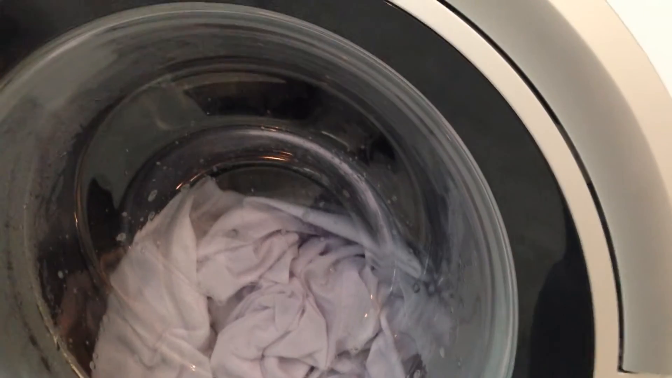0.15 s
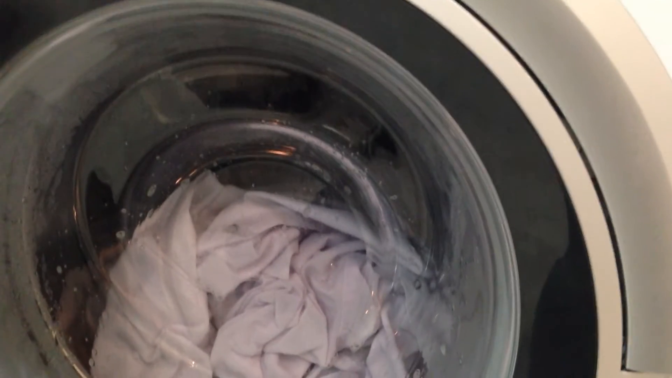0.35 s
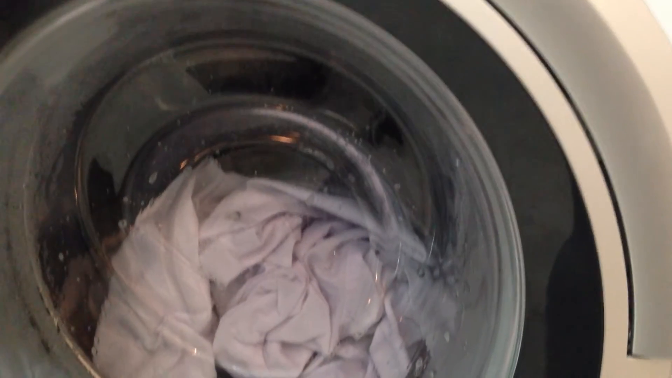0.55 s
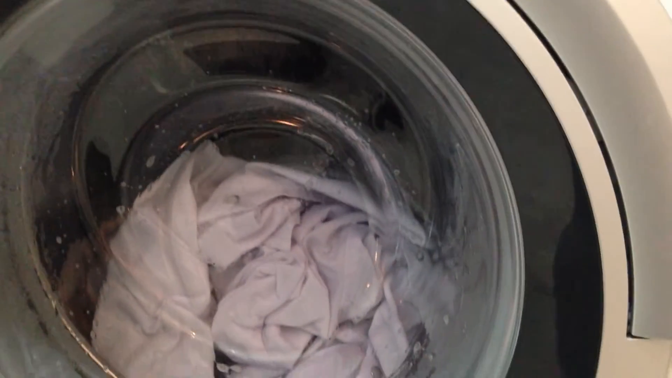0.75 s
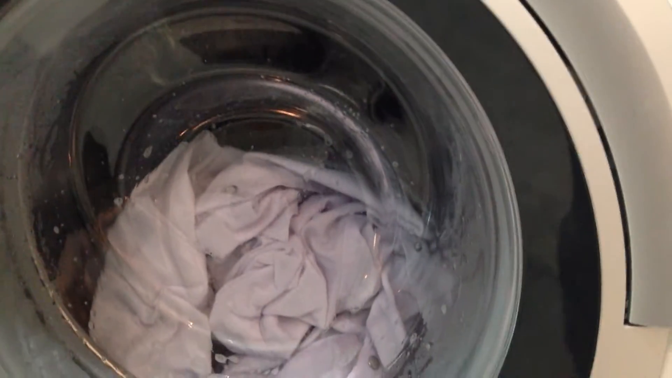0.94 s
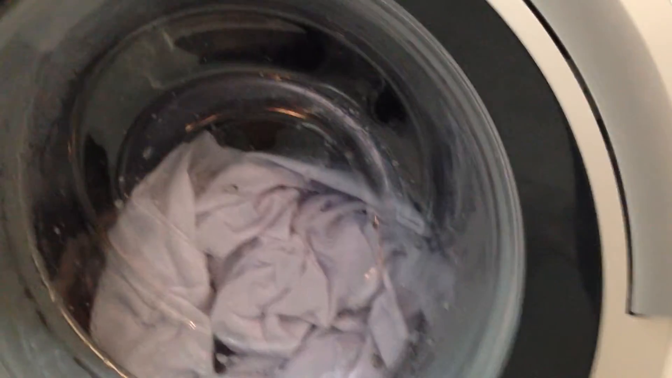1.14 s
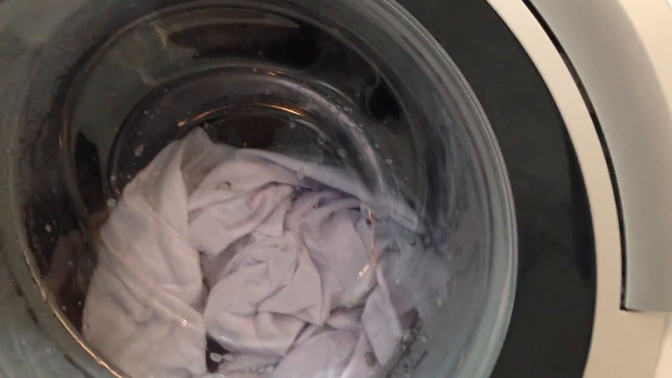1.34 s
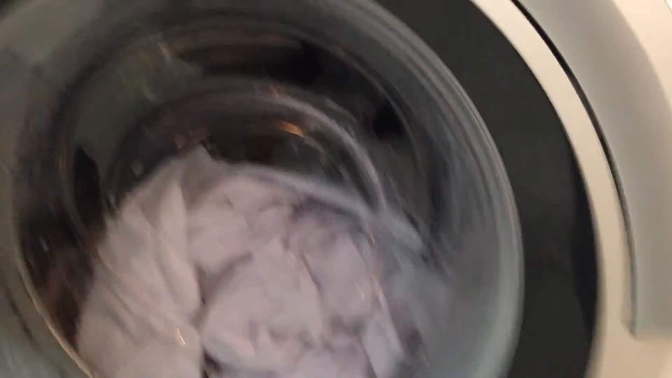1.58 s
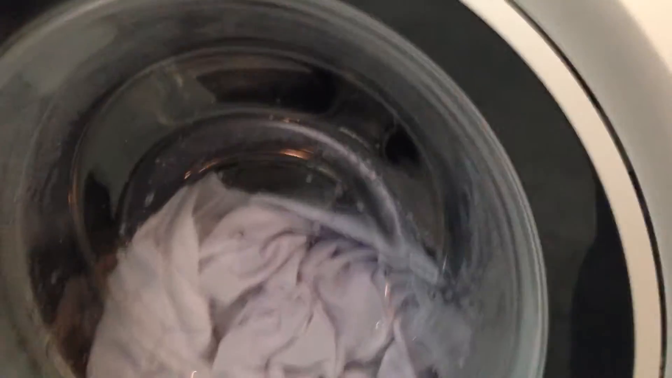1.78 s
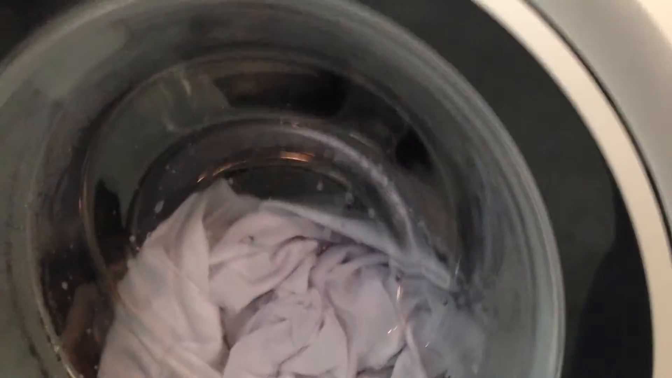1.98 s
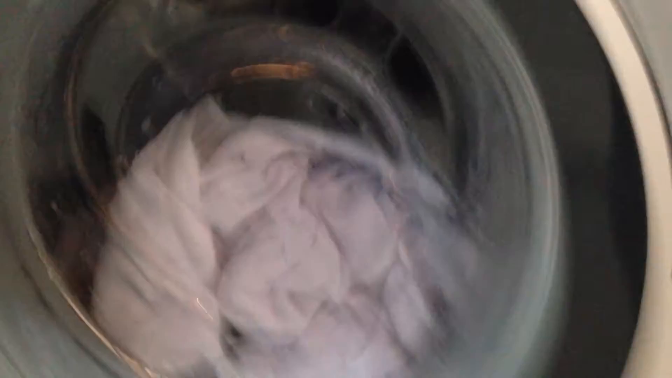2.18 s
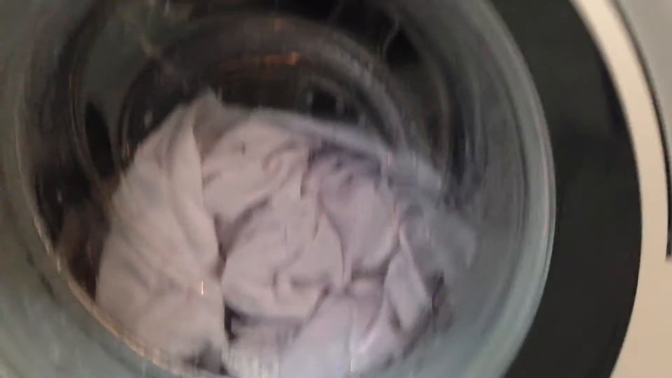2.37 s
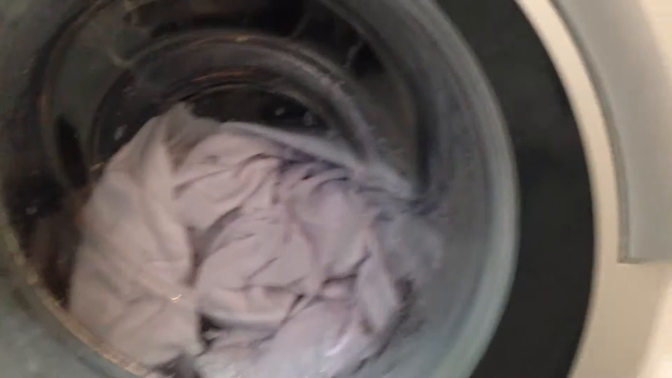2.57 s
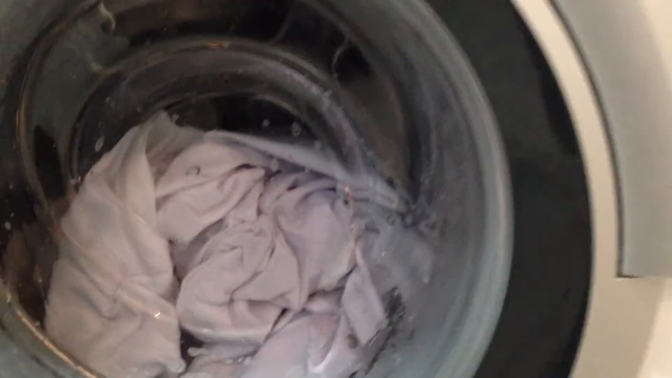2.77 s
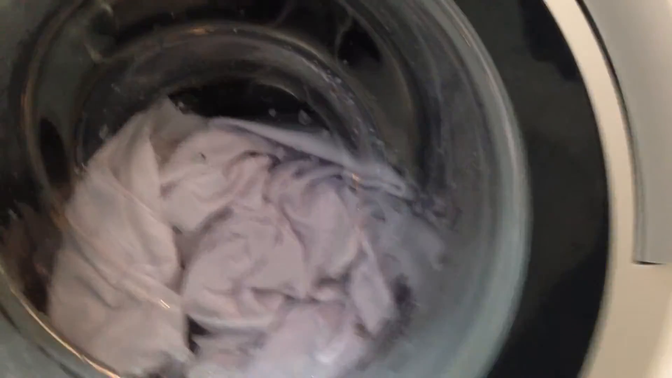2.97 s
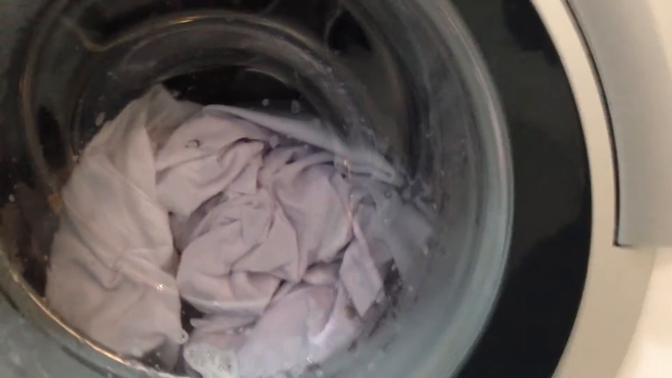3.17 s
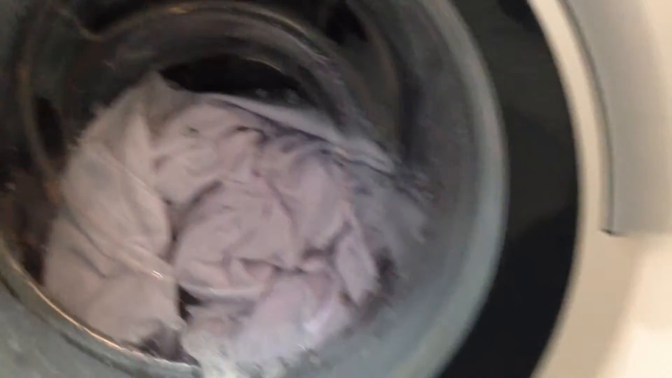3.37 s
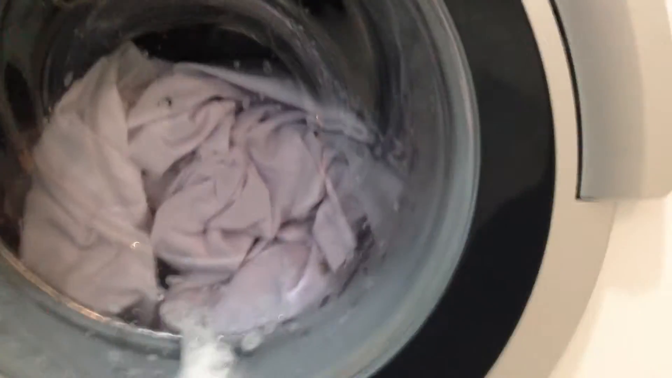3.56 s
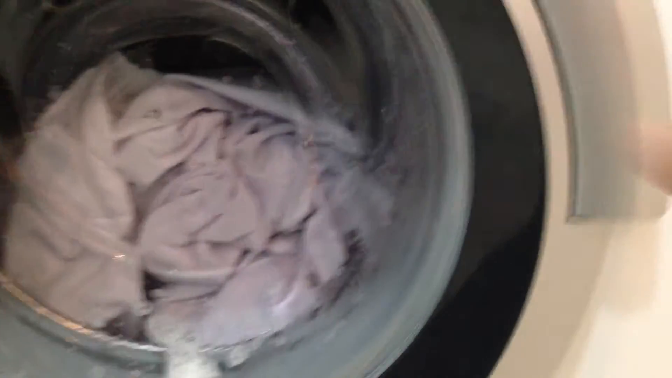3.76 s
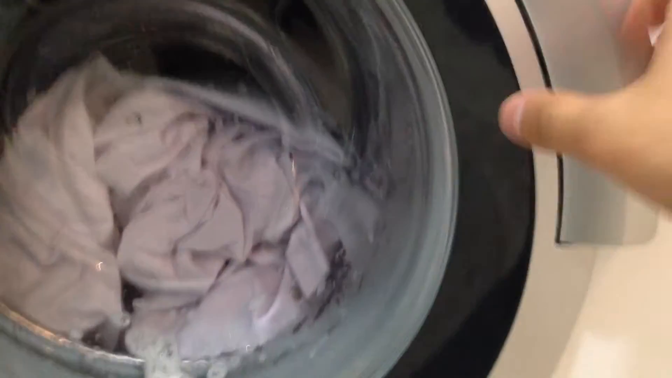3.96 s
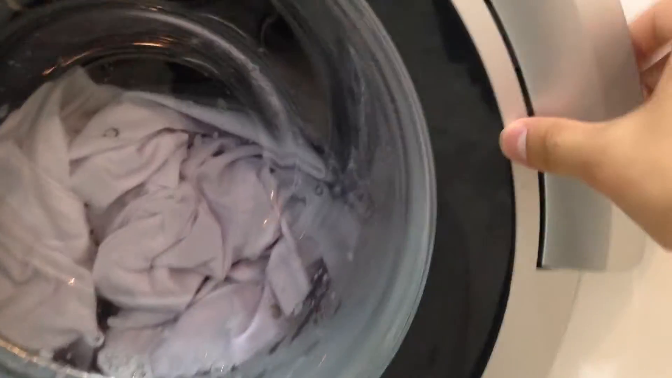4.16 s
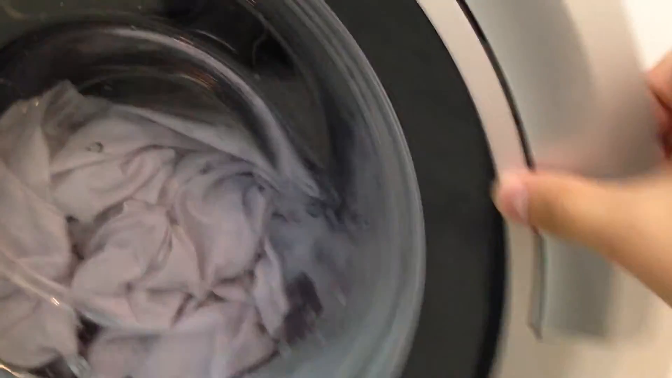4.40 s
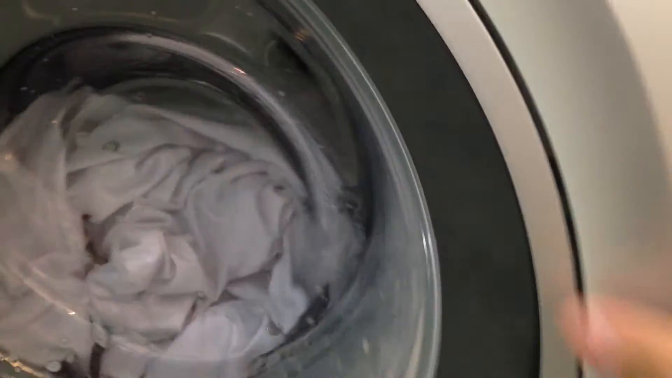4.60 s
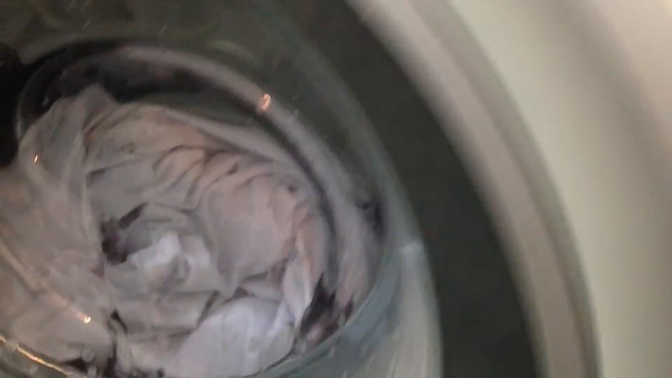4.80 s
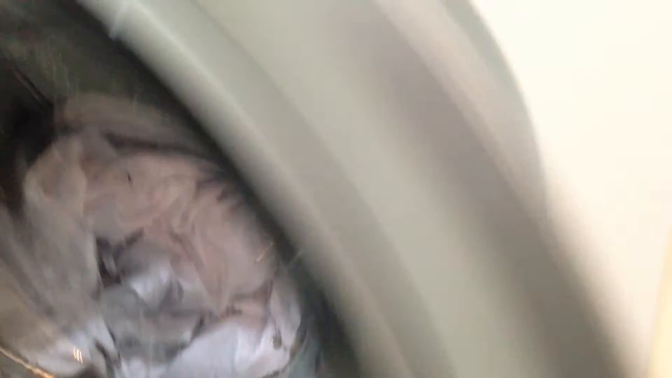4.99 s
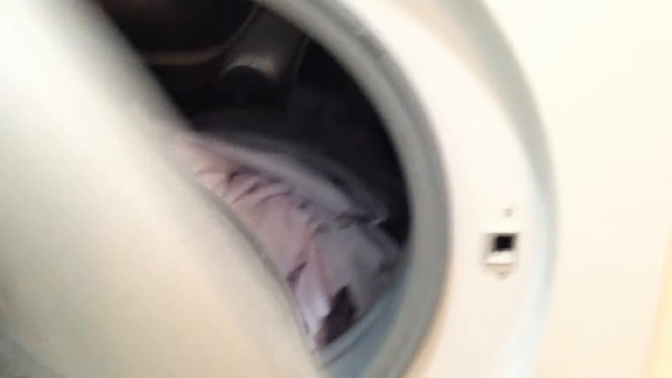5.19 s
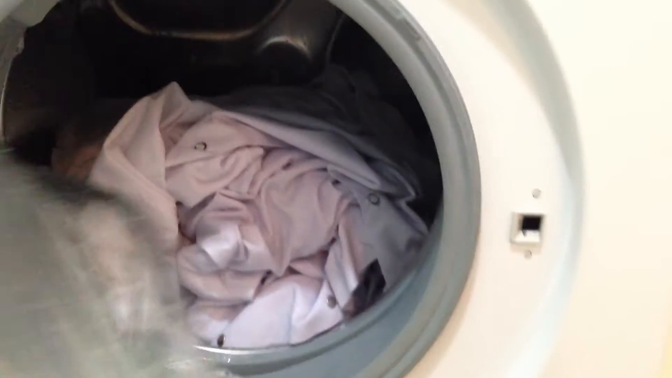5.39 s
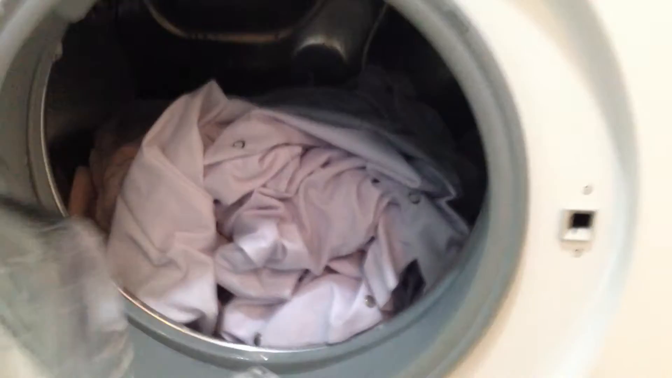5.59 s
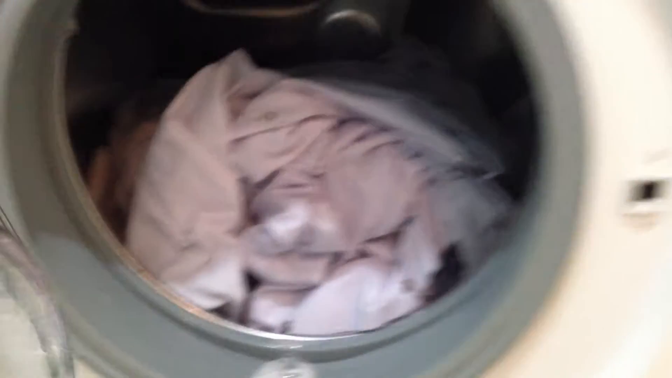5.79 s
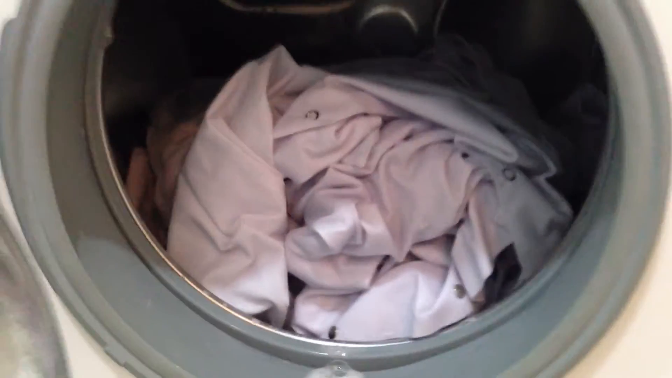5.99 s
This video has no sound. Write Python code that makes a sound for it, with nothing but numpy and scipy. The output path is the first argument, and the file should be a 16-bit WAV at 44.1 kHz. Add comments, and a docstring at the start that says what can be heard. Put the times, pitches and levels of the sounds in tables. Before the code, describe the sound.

Close, clean indoor pickup of a washing machine door. Low room tone holds a few tiny ticks, a faint metallic ring, cloth rustles and soft bumps. Then a very loud, bright lock snap with a quick rattle and metallic ring, small knocks, handle clicks, a brief stuttering rubber pull and a hard double latch clack. Afterward only faint sliding and scuffing remain.

```python
"""Washing machine door opening

A front-loading washing machine stands finished in a small hard-walled room. Its door lock snaps back
and rings the cabinet; the handle is taken, the rubber seal judders loose, the latch clacks, the door opens.
Blows are noise cracks filtered by the body, plus a room tail and ringing modes; seal slips are damped sines.
Someone shifts about quietly: ticks, bumps and a faint ring, and shaped noise for rustles, slides and room tone."""
import sys
import numpy as np
from scipy import signal
from scipy.fft import rfft, irfft
from scipy.io import wavfile

SR = 44100
rng = np.random.default_rng(int(sys.argv[2]) if len(sys.argv) > 2 else 0)


def bounce(signal):
    """Save signal as a 16-bit WAV file at the path given by the first command-line argument."""
    frames = np.transpose(np.atleast_2d(signal))
    limited = np.clip(frames, -1, 1)
    pcm = np.round(limited * 32767).astype(np.int16)
    wavfile.write(sys.argv[1], SR, pcm)


N = 266408
TIME = np.arange(N) / SR
AGE = TIME[:int(.8 * SR)]  # seconds since a blow
BAND_EDGES_HZ = np.geomspace(25, 16000, 29)
BAND_HZ = np.sqrt(BAND_EDGES_HZ[1:] * BAND_EDGES_HZ[:-1])
BANDS = [signal.butter(2, edges, "band", fs=SR, output="sos") for edges in zip(BAND_EDGES_HZ, BAND_EDGES_HZ[1:])]


def amp(db):
    """Decibels to gain."""
    return 10 ** (np.asarray(db) / 20)


def at_hz(points, hz):
    """Read a table on a log-frequency axis."""
    f, value = np.transpose(points)
    return np.interp(np.log(hz), np.log(f), value)


def high_pass(sound, order, cut_hz):
    """Butterworth low cut."""
    return signal.sosfilt(signal.butter(order, cut_hz, "high", fs=SR, output="sos"), sound)


def band_gains(spectrum):
    """Band gains that give white noise this colour at rms 1."""
    gain = amp(at_hz(spectrum, BAND_HZ))
    power = np.sum(gain ** 2 * np.diff(BAND_EDGES_HZ)) * 2 / SR
    return gain / np.sqrt(power)


def hiss(spectrum):
    """Steady coloured noise, rms 1; neighbouring bands use separate noises."""
    white = rng.standard_normal((2, N))
    out = np.zeros(N)
    for k, (sos, gain) in enumerate(zip(BANDS, band_gains(spectrum))):
        out += gain * signal.sosfilt(sos, white[k % 2])
    return out


def fade(t60_s):
    """An exponential decay from 1, down 60 dB at t60_s."""
    return np.exp(-np.log(1000) * AGE / t60_s)


def ring(modes):
    """Damped sines of a body struck once, in alternating sign."""
    return sum((-1) ** k * amp(db) * fade(t60_s) * np.sin(2 * np.pi * hz * AGE)
               for k, (hz, db, t60_s) in enumerate(modes))


def add(out, s, sound):
    """Mix a sound in at time s."""
    at = int(s * SR)
    out[at:at + len(sound)] += sound[:N - at]


def hardness(hz, bass_db, treble_db, bass_hz=350, treble_hz=3500):
    """Two shelves in dB: heavy contacts add bass, hard ones add treble."""
    return bass_db / (1 + (hz / bass_hz) ** 4) + treble_db / (1 + (treble_hz / hz) ** 4)


def resonances(hz, peaks):
    """Gain in dB of a set of bell-shaped resonances."""
    return sum(db / (1 + (2 * (hz - centre_hz) / width_hz) ** 2) for centre_hz, width_hz, db in peaks)


def filtered(sound, gain):
    """Causal (minimum-phase) filter with this gain on an even frequency grid: nothing sounds early."""
    cepstrum = irfft(np.log(gain))
    size = len(cepstrum)
    # folding the cepstrum forward gives minimum phase
    cepstrum[1:size // 2] *= 2
    cepstrum[size // 2 + 1:] = 0
    return irfft(rfft(sound, size) * np.exp(rfft(cepstrum)))[:len(sound)]


# Room decay. Each row: frequency in Hz, t60 in seconds.
ROOM_DECAY = [(60, 0.97), (200, .5), (600, 0.52), (1500, 0.43), (3000, 0.42), (5500, .36), (9000, 0.27),
              (15000, 0.32)]


def room_tail(build_s):
    """Diffuse echoes swell quickly, then die at a rate set by frequency."""
    white = rng.standard_normal((2, len(AGE)))
    dying = np.zeros(len(AGE))
    for k, t60_s in enumerate(at_hz(ROOM_DECAY, BAND_HZ)):
        dying += signal.sosfilt(BANDS[k], white[k % 2]) * fade(t60_s)
    return dying * (1 - np.exp(-AGE / build_s))


def blows(rows, colour, peaks, modes, contact_t60_s, room_db, snap_db, modes_db, build_s, thin_hz,
          tail_peak_share=0.18):
    """Each blow: a snap and short crack coloured by the body, the room's tail, and clear modes that ring on."""
    out, hz = np.zeros(N), np.linspace(1, SR / 2, 32769)
    peaks_db = resonances(hz, peaks)
    body = amp(at_hz(colour, hz) + peaks_db)
    body /= np.sqrt(np.mean(body ** 2))
    # the room gathers sound from every side of the body, so its tail is less peaky
    diffuse = body * amp((tail_peak_share - 1) * peaks_db)
    diffuse /= np.sqrt(np.mean(diffuse ** 2))
    for s, level_db, bass_db, treble_db in rows:
        crack = rng.standard_normal(len(AGE)) * fade(contact_t60_s)
        crack[0] += amp(snap_db)
        # the first crack is thin: its bass only builds up in the room
        crack = high_pass(crack, 2, thin_hz)
        contact = amp(hardness(hz, bass_db, treble_db))
        direct = filtered(crack, body * contact)
        tail = filtered(room_tail(build_s), diffuse * contact)
        struck_modes = [(f, db + hardness(f, bass_db, treble_db) + rng.normal(0, 1), t60_s)
                        for f, db, t60_s in modes]
        add(out, s, amp(level_db) * (direct + amp(room_db) * tail + amp(modes_db) * ring(struck_modes)))
    return out


def stroke(s, length_s, level_db, rise_share=.42):
    """Gain of one rubbing stroke: a rounded swell to its peak at s, then a slower fade."""
    phase = (TIME - s) / (length_s * np.where(TIME < s, rise_share, 1 - rise_share))
    return amp(level_db) * np.exp(1 - np.hypot(1, 2 * phase / np.sqrt(2)))


# Room noise spectrum. Each row: frequency in Hz, relative density in dB per Hz.
ROOM_COLOUR = [(15, -41), (25, -17), (55, -3.5), (183, -1), (221, -4), (267, -1.5), (349, -8.5), (445, -8),
               (684, -11.5), (895, -15), (1200, -16), (1410, -17), (3830, -13.5), (14300, -16.5),
               (15500, -18)]


def room_tone(level_db=-67.5):
    """Steady coloured noise of the quiet room."""
    return amp(level_db) * hiss(ROOM_COLOUR)


# Sharp ticks. Each row: start in seconds, relative level in dB, bass in dB, treble in dB.
TICK_HITS = [(.568, -44, 13.5, 1.5), (.697, -53, 10, -3.5), (1.835, -49.5, -2, -17), (2.022, -45, -17, -10),
             (2.046, -45.5, -7, -14), (2.056, -41, -16, -24), (4.020, -41.5, 10, -8.5)]
# Tick spectrum. Each row: frequency in Hz, relative density in dB per Hz.
TICK_SPECTRUM = [(50, -29), (110, -9.5), (300, -5.5), (550, -13), (850, -6), (1300, -7.5), (1900, -12.5),
                 (2800, -17.5), (4700, -2), (6500, -9), (9000, -6.5), (11000, -14), (13500, -9.5),
                 (15500, -36)]
# Tick resonances. Each row: centre in Hz, width in Hz, gain in dB.
TICK_RESONANCES = [(1830, 290, 8.1), (2046, 120, 7.1), (4580, 750, 4.5), (5060, 400, 6), (8800, 530, 8.3),
                   (13200, 760, 5)]
# Ring left by the ticks. Each row: frequency in Hz, relative level in dB, t60 in seconds.
TICK_RING = [(132, -29, 0.65), (281, -26, 0.53), (352, -23.5, 0.63), (1984, -22.5, 0.19), (4640, -50, 0.12)]


def ticks():
    """Sharp ticks of the lock and of fingers on the plastic: short cracks and faint modes."""
    return blows(TICK_HITS, TICK_SPECTRUM, TICK_RESONANCES, TICK_RING, contact_t60_s=0.037,
                 room_db=-13, snap_db=-9, modes_db=-2.5, build_s=0.01, thin_hz=247)


# Faint ring. Each row: frequency in Hz, relative level in dB, t60 in seconds.
TING_RING = [(342.5, 2, 0.11), (463, -20, 0.96), (1200, -11, 0.16), (1563, -4.5, 0.31), (1650, -5.5, 0.32),
             (1612, -7, 0.45), (1780, -9, 0.13), (1850, -13, .4), (2090, -7.5, 0.15)]


def ting(start_s=.692, level_db=-53.5, rise_s=0.0066, direct_db=-2, room_db=-4):
    """A faint metallic ring: damped sines that swell and fade, blurred by the room."""
    out, tail = np.zeros(N), room_tail(rise_s)
    direct = (1 - np.exp(-AGE / rise_s)) * ring(TING_RING)
    echoes = signal.fftconvolve(direct, tail / np.linalg.norm(tail))[:len(AGE)]
    add(out, start_s, amp(level_db) * (amp(direct_db) * direct + amp(room_db) * echoes))
    return out


# Sleeve and foot scuffs. Each row: peak in seconds, length in seconds, relative level in dB, centre in Hz.
RUSTLE_STROKES = [(1.828, 0.35, -69, 1930), (2.16, 0.13, -62, 1080), (2.274, 0.21, -63.5, 690),
                  (5.53, 0.56, -71, 2600), (5.774, 0.021, -62.5, 1400), (5.825, 0.034, -61.5, 930),
                  (5.883, 0.082, -61, 746), (5.98, 0.03, -62, 746)]


def rustle(width_octaves=1.0, grain_db=1.5, trim_db=-5.0):
    """Brushes and scuffs of sleeves and feet: grainy noise whose centre follows the strokes' power-weighted
    mean centre."""
    power = np.array([stroke(s, length_s, db) ** 2 for s, length_s, db, _ in RUSTLE_STROKES]) + 1e-18
    total_power = power.sum(axis=0)
    centre_hz = np.array(RUSTLE_STROKES)[:, -1] @ power / total_power
    grain = np.interp(TIME, np.linspace(0, TIME[-1], 900), rng.standard_normal(900))
    white, octave = rng.standard_normal((2, N)), np.log2(centre_hz)
    out = np.zeros(N)
    for k, (sos, hz) in enumerate(zip(BANDS, BAND_HZ)):
        out += signal.sosfilt(sos, white[k % 2]) / (1 + ((np.log2(hz) - octave) / width_octaves) ** 2)
    # bandwidth grows with the centre, so divide it out
    return out * np.sqrt(total_power * SR / centre_hz) * amp(trim_db + grain_db * grain)


# Soft low bumps. Each row: start in seconds, relative level in dB, bass in dB, treble in dB.
BUMP_HITS = [(2.19, -55.5, 1, -9), (2.332, -51.5, 8, -5), (2.351, -45, -7, -5), (2.388, -50, -7.5, -7),
             (3.517, -47.5, 5.5, -20), (3.542, -48, 9.5, -14), (4.012, -51.5, 12, -17),
             (4.303, -37, 4, -22)]
# Bump spectrum. Each row: frequency in Hz, relative density in dB per Hz.
BUMP_SPECTRUM = [(40, -25.5), (90, -19), (170, -1), (280, -18), (550, -19.5), (1000, -35.5), (2200, -28.5),
                 (6000, -35), (14000, -48.5)]
# Broad bump resonances. Each row: centre in Hz, width in Hz, gain in dB.
BUMP_RESONANCES = [(155, 50, 3), (500, 95, 4)]
# Bump ring. Each row: frequency in Hz, relative level in dB, t60 in seconds.
BUMP_RING = [(152, -12, 0.54), (198.2, -2.5, 0.34)]


def bumps():
    """Soft low bumps: bass-heavy cracks over two low modes."""
    return blows(BUMP_HITS, BUMP_SPECTRUM, BUMP_RESONANCES, BUMP_RING, contact_t60_s=0.06,
                 room_db=-7.5, snap_db=4.0, modes_db=-6, build_s=0.0092, thin_hz=60.1)


# Lock bolt ticks, slides, hits its stop (last). Each row: start in seconds, relative level in dB,
# bass in dB, treble in dB.
BOLT_HITS = [(3.0415, -52, -22, 2), (3.0603, -29.5, -13, -4.5), (3.0625, -26.5, -6, -2),
             (3.0652, -14, -0.5, 1.5)]
# Lock spectrum. Each row: frequency in Hz, relative density in dB per Hz.
LOCK_SPECTRUM = [(30, -29), (60, -14), (125, -6.5), (220, -3.5), (370, -4), (540, -6.5), (650, -15),
                 (790, -6), (1400, -9), (2400, -6.5), (3400, -11.5), (6000, -15.5), (9500, -19.5),
                 (15000, -22)]
# Panel resonances. Each row: centre in Hz, width in Hz, gain in dB.
LOCK_RESONANCES = [(730, 43, 1), (903, 52, 6.5), (1013, 80, 6), (1147, 100, 7), (1760, 40, 11.5),
                   (2090, 40, 3.5), (2300, 110, 7), (2970, 24, 0.5), (4310, 200, 7.5), (5900, 210, 5.5),
                   (7310, 100, 11.5), (10500, 60, 9)]
# Long cabinet ring. Each row: frequency in Hz, relative level in dB, t60 in seconds.
CABINET_RING = [(125, -19.5, 0.72), (137, -27.5, 0.36), (183.4, -22.5, 0.58), (301.5, -24, 0.86),
                (293, -23, .35), (375.4, -19, 0.39), (766, -16, 0.51), (1075, -23.5, .36),
                (1454, -27.5, 0.45), (1872, -24.5, .38), (2220, -27.5, .3), (2692, -21.5, 0.11),
                (2980, -27, 0.17), (4490, -32, 0.31), (5770, -24.5, 0.2)]


def lock(rebounds=3, gap_s=.0076, drop_db=10, loss_db=0.5, treble_db=-6.5):
    """The bolt travels, hits its stop and rebounds, weaker and duller; the cabinet rings."""
    stop_s, stop_db = BOLT_HITS[-1][:2]
    hits = list(BOLT_HITS)
    for k in range(rebounds):
        hits.append((stop_s + (k + 1) * gap_s, stop_db - drop_db - k * loss_db, 0, treble_db))
    return blows(hits, LOCK_SPECTRUM, LOCK_RESONANCES, CABINET_RING, contact_t60_s=0.046,
                 room_db=-10.5, snap_db=10.0, modes_db=-5.0, build_s=0.0049, thin_hz=400)


# Dull knocks: first the lock lets go with a knock inside, then the door knocks in its frame. Each row: start in
# seconds, relative level in dB, bass in dB, treble in dB.
KNOCK_HITS = [(3.515, -38, -11, -15), (4.308, -38.5, -1.5, 6), (4.3525, -41.5, 1, -6),
              (4.3955, -34.5, 3.5, -2), (4.411, -35, 4, -1.5)]
# Knock spectrum. Each row: frequency in Hz, relative density in dB per Hz.
FRAME_SPECTRUM = [(40, -12), (130, 4), (330, 3.5), (480, -3.5), (620, -5.5), (840, 2.5), (1000, -3),
                  (1180, 0.5), (1500, -7.5), (2300, -9), (2900, -15.5), (5000, -21.5), (7500, -35),
                  (15000, -45.5)]
# Broad frame resonances. Each row: centre in Hz, width in Hz, gain in dB.
FRAME_RESONANCES = [(503, 60, 6), (900, 160, 6.5), (1380, 70, -3), (2900, 970, -6.5)]


def knocks():
    """Dull knocks sharing one colour: the lock's release inside, then the door in its frame; cracks and room
    tail, no ringing modes."""
    return blows(KNOCK_HITS, FRAME_SPECTRUM, FRAME_RESONANCES, [], contact_t60_s=0.05,
                 room_db=-11.5, snap_db=7, modes_db=0, build_s=0.0061, thin_hz=149.4)


# Door rocks as the lock lets go, at the grip and in the swing. Each row: start in seconds,
# relative level in dB, sharpness in dB.
ROCKS = [(3.534, -53, -14), (4.016, -51, -9), (4.585, -61, 10), (4.715, -54.5, -7)]
# Door on its seal, two sway modes first. Each row: frequency in Hz, relative level in dB, t60 in seconds.
SEAL_RING = [(64, -0.5, 0.26), (93.5, 6.5, .07), (132, -6.5, 0.086), (194.8, -7, 0.2), (282, -16.5, .08),
             (381, -19, 0.12)]


def seal(slips_hz=65.3, start_s=4.302, free_s=4.463, pull_db=-39.5, breakaway_db=6, breakaway_s=.013,
         peel_s=4.385, peel_rise_s=0.028, drag_sharp_db=-7, peel_sharp_db=10, chatter_db=-9, low_cut_hz=53):
    """The seal breaks away, drags in uneven slips and comes free; sharp slips shake the door's higher modes."""
    late, size_db = (rng.standard_normal((40, 2)) * [.07, 1.5]).T  # late: share of a slip period
    age_s = np.arange(len(late)) / slips_hz
    times = start_s + age_s + late / slips_hz
    level_db = pull_db + breakaway_db * np.exp(-age_s / breakaway_s) + size_db
    # slips turn sharp once the lip peels off the glass
    sharp_db = np.interp(times, [peel_s, peel_s + peel_rise_s], [drag_sharp_db, peel_sharp_db])
    slips = np.column_stack([times, level_db, sharp_db])[times < free_s]
    # once peeled, the lip also chatters halfway between slips
    chatter = [(s + .5 / slips_hz, db + chatter_db, sharp) for s, db, sharp in slips if s > peel_s]
    out, sway, shudder = np.zeros(N), ring(SEAL_RING[:2]), ring(SEAL_RING[2:])
    for s, db, sharp in [*slips, *chatter, *ROCKS]:
        add(out, s, amp(db) * (sway + amp(sharp) * shudder))
    # keep the judder free of rumble below its lowest mode
    return high_pass(out, 4, low_cut_hz)


# Plastic handle clicks. Each row: start in seconds, relative level in dB, bass in dB, treble in dB.
HANDLE_HITS = [(4.020, -48, 2, 18), (4.0995, -47.5, -3, 2), (4.139, -52, 7, 12), (4.173, -50, 0, 6),
               (4.1785, -31, -3, 5), (4.196, -39, 3.5, 0)]
# Handle spectrum. Each row: frequency in Hz, relative density in dB per Hz.
HANDLE_SPECTRUM = [(35, 16), (70, 9), (150, -17), (330, 0), (600, -8), (800, -2), (1200, -5), (1900, -5.5),
                   (2500, -5.5), (3500, -15), (5000, -21.5), (7000, -28), (10000, -33.5), (15000, -43)]
# Door resonances. Each row: centre in Hz, width in Hz, gain in dB.
DOOR_RESONANCES = [(318, 34, 11), (853, 150, 12), (1210, 53, 2.1), (2220, 54, 7.4), (2443, 32, 11),
                   (3250, 170, 3), (4280, 880, 4.4)]
# Door ring. Each row: frequency in Hz, relative level in dB, t60 in seconds.
DOOR_RING = [(124.2, -20.5, 0.98), (191.4, -16, 0.42), (767.5, -14, 0.16), (900, -7.5, 0.046),
             (2570, -16.5, .2)]


def handle():
    """Clicks of the plastic handle: cracks coloured by the door, which rings."""
    return blows(HANDLE_HITS, HANDLE_SPECTRUM, DOOR_RESONANCES, DOOR_RING, contact_t60_s=.085,
                 room_db=-8.5, snap_db=14, modes_db=-3.5, build_s=.009, thin_hz=150)


# Finger slides. Each row: peak in seconds, length in seconds, level in dB.
FINGER_STROKES = [(4.125, 0.031, -62.5), (4.18, 0.42, -69), (4.699, .26, -66), (5.104, 0.58, -77.5)]
# Slide spectrum. Each row: frequency in Hz, relative density in dB per Hz.
SLIDE_SPECTRUM = [(300, -2.5), (1500, -3), (4000, 0), (8000, -4), (15000, -12.5)]


def fingers():
    """Fingers sliding on the plastic: coloured noise shaped by rounded strokes."""
    return sum(stroke(*row) for row in FINGER_STROKES) * hiss(SLIDE_SPECTRUM)


# Latch hook jumps off its catch and lands. Each row: start in seconds, relative level in dB,
# bass in dB, treble in dB.
LATCH_HITS = [(4.4797, -23.5, -2, 1.5), (4.4825, -26, -2, -2)]
# Latch spectrum. Each row: frequency in Hz, relative density in dB per Hz.
LATCH_SPECTRUM = [(40, -19.5), (120, 2.5), (220, -9), (400, -6.5), (600, -15), (780, -8.5), (1150, -2.5),
                  (1800, -8), (2500, -9), (3400, -16), (5000, -22), (6500, -35), (10000, -35),
                  (15000, -51.5)]
# Latch resonances. Each row: centre in Hz, width in Hz, gain in dB.
LATCH_RESONANCES = [(1160, 120, 13), (1460, 80, 7.8), (2260, 240, 5.1), (3680, 260, 7.3), (8000, 650, 12)]
# Latch ring. Each row: frequency in Hz, relative level in dB, t60 in seconds.
LATCH_RING = [(195.1, -24.5, 0.83), (760, -14, 0.046), (1016, -7.5, 0.028), (1087, -37, 0.22),
              (1130, -29, .35), (1190, -1, 0.052), (1680, -33.5, 0.45), (2243, -24, 0.25),
              (2396, -11.5, 0.077), (2605, -26.5, .23)]


def latch():
    """The latch hook jumps off its catch and lands again: two hard cracks over ringing modes."""
    return blows(LATCH_HITS, LATCH_SPECTRUM, LATCH_RESONANCES, LATCH_RING, contact_t60_s=.03,
                 room_db=-18.5, snap_db=12, modes_db=2, build_s=0.0048, thin_hz=300.3)


def scene():
    """Lock, door and small movements over the quiet room."""
    movements = ticks() + ting() + rustle() + bumps() + fingers()
    door = lock() + knocks() + seal() + handle() + latch()
    return (room_tone() + movements + door)[None]


def record(dry, low_cut_hz=36, top_cut_hz=15400):
    """The microphone loses the deepest bass; the top is cut steeply."""
    thinned = high_pass(dry, 2, low_cut_hz)
    return signal.sosfilt(signal.ellip(12, .1, 80, top_cut_hz, fs=SR, output="sos"), thinned)


dry = scene()
out = record(dry)
bounce(out)
```